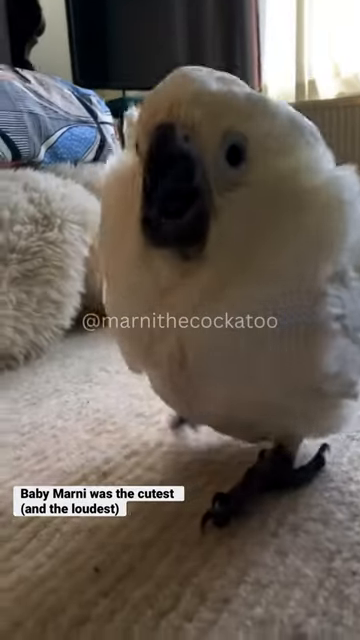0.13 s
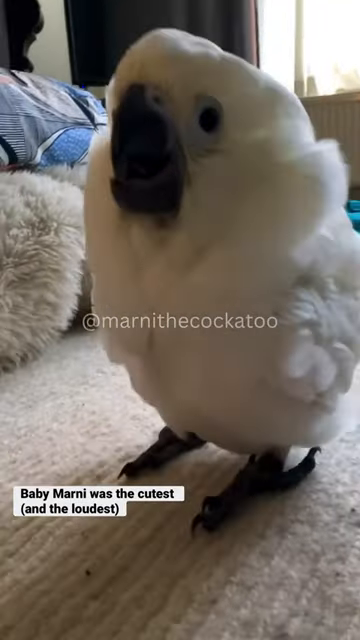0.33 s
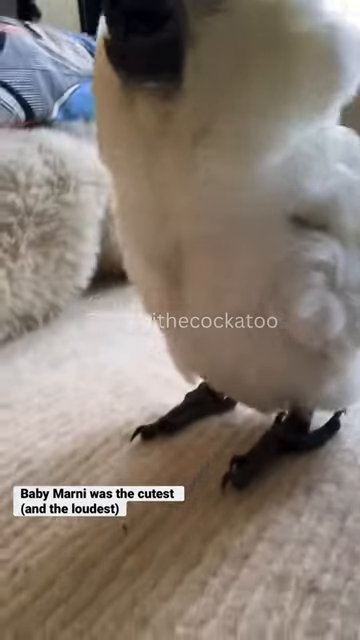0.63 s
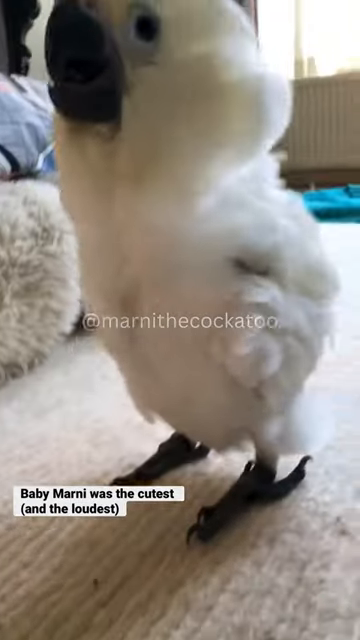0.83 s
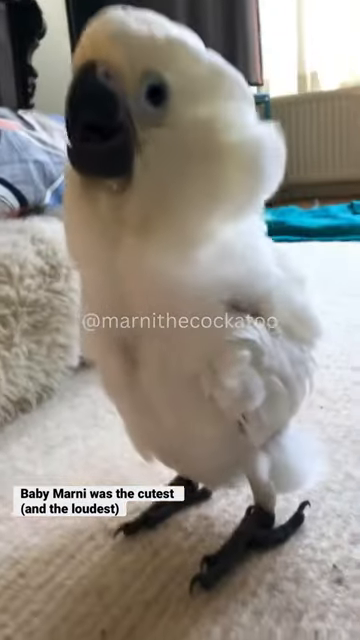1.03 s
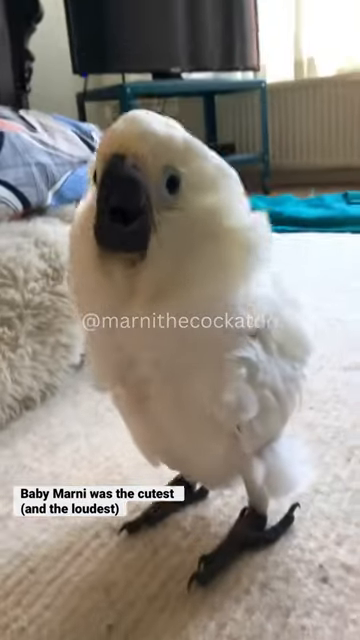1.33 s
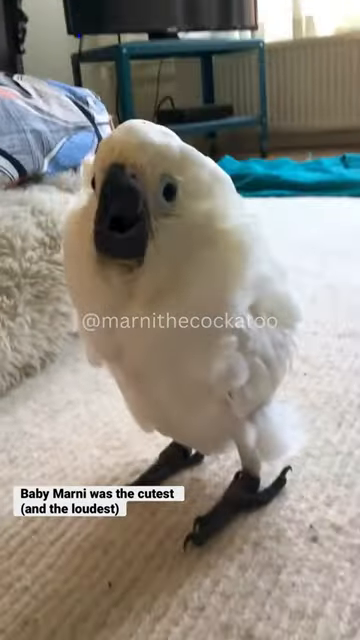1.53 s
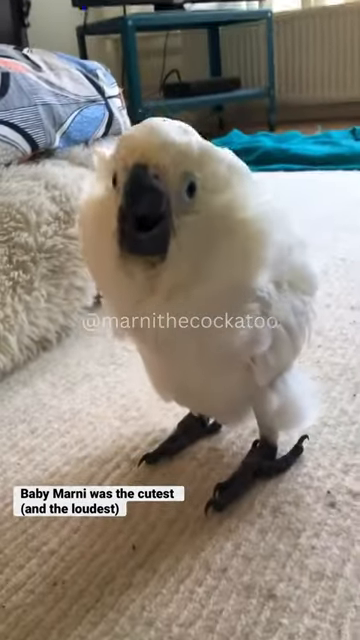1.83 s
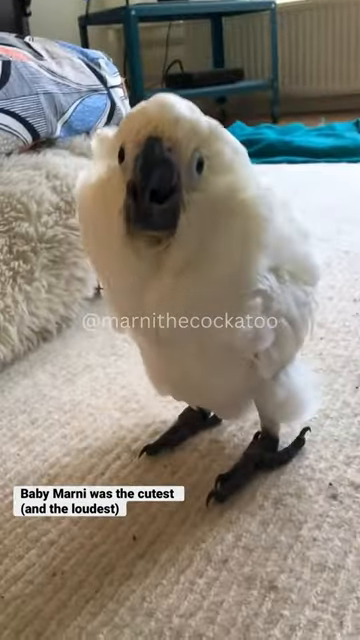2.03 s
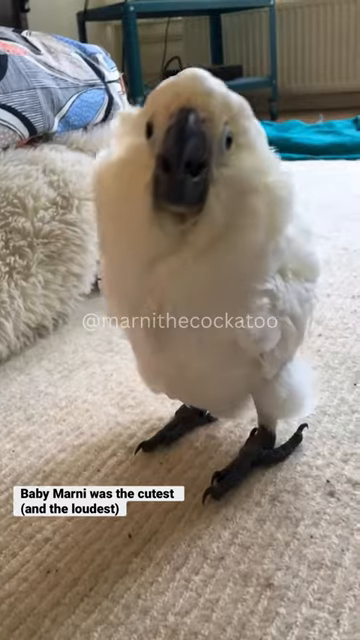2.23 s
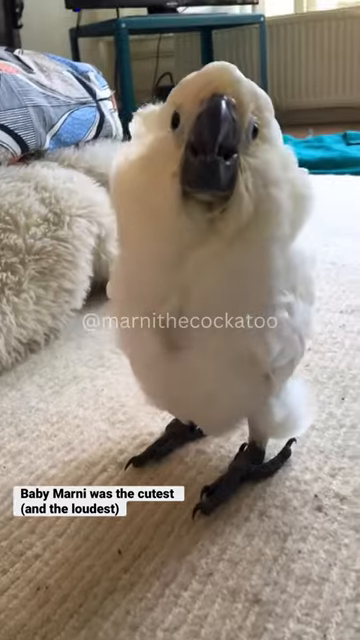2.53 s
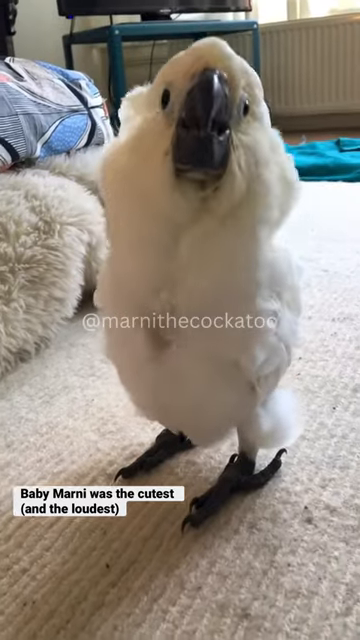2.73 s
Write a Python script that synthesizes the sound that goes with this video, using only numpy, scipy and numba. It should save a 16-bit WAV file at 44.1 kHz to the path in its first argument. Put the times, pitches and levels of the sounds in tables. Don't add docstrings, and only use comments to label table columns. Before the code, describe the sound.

Two loud, grating squawks from a baby cockatoo, after soft handling rumble and feather rustle

```python
import sys
import numpy as np
from scipy import signal
from scipy.fft import rfft, irfft, next_fast_len
from scipy.io import wavfile
from scipy.ndimage import uniform_filter1d, map_coordinates
from numba import njit

SR = 44100
rng = np.random.default_rng(int(sys.argv[2]) if len(sys.argv) > 2 else 0)


def rack_gain(trim_db):
    fader = np.asarray(trim_db, float)
    return 10 ** (fader / 20)


def int16_out(signal):
    q = np.round(np.clip(np.atleast_2d(signal).T, -1, 1) * 32767)
    wavfile.write(sys.argv[1], SR, q.astype(np.int16))


N = 126567


def unit(x):
    return x / np.sqrt(np.mean(x ** 2) + 1e-20)


def along(points, hz):
    f, v = np.transpose(points)
    return np.interp(np.log(hz + 1), np.log(f + 1), v)


def curves(rows):
    s, *cols = np.transpose(rows)
    return [np.interp(np.arange(N) / SR, s, c) for c in cols]


def during(rows):
    return (np.arange(N) > rows[0][0] * SR) & (np.arange(N) < rows[-1][0] * SR)


def wobble(rate):
    knots = rng.standard_normal(int(N * rate / SR) + 4)
    return map_coordinates(knots, [np.arange(N) * rate / SR])


def filtered(x, response):
    m = next_fast_len(N + SR // 2)
    return irfft(rfft(x, m) * response(np.fft.rfftfreq(m, 1 / SR)), m)[..., :N]


def rush(spectrum, patchy_db):
    z = signal.stft(rng.standard_normal(N), nperseg=512)[2]
    field = uniform_filter1d(rng.standard_normal(z.shape), 6, 0)
    field = unit(uniform_filter1d(field, 8, 1))
    x = signal.istft(z * rack_gain(patchy_db * field), nperseg=512)[1][:N]
    lowest, highest = spectrum[0][0], spectrum[-1][0]
    return unit(filtered(x, lambda hz: rack_gain(along(spectrum, hz)) * (hz >= lowest) * (hz <= highest)))


@njit
def resonate(x, hz, width_hz, rate):
    y, r = np.zeros(len(x)), np.exp(-np.pi * width_hz / rate)
    for i in range(2, len(x)):
        push = (1 - r * r) / 2 * (x[i] - x[i - 2])
        y[i] = push + 2 * r * np.cos(2 * np.pi * hz[i] / rate) * y[i - 1] - r * r * y[i - 2]
    return y


def ring(s, db, hz, t60, rise):
    t = np.clip(np.arange(N) / SR - s, 0, None)
    return rack_gain(db - 60 * t / t60) * np.sin(2 * np.pi * hz * t) * (1 - np.exp(-t / rise))


def hissing(rings, level):
    flow = sum(rack_gain(g) * resonate(rng.standard_normal(N), np.full(N, hz * 1.), float(w), SR)
               for hz, w, g in rings)
    return unit(flow) * rack_gain(curves(level)[0]) * during(level)


def syrinx(rate, rough, swing):
    # f/Hz, level/dB
    snap_tone = [(250, 9.5), (500, 10), (800, 8.5), (1200, 2), (2600, 1), (3200, 6), (4400, -10),
                 (16000, -15.5)]
    turns = np.cumsum(rate * np.exp(.55 * rough * wobble(700))) / SR
    at = np.interp(np.arange(1, int(turns[-1])), turns, np.arange(N))
    i = at.astype(int)
    scatter_db = 7 * rough[i] * rng.standard_normal(len(i))
    beat_depth = .22 + .6 * np.clip(2 - 2 * rough[i] / .17, 0, 1)
    size = rack_gain(scatter_db) * (1 + beat_depth * swing[i])
    tap = i[:, None] + np.arange(-7, 9)
    late = tap - at[:, None]
    shape = np.sinc(late) * np.cos(np.pi * late / 16) ** 2
    snaps = np.bincount(np.clip(tap, 0, N - 1).ravel(), (size[:, None] * shape).ravel(), N)
    breath = .5 * rough * rng.standard_normal(N)
    return filtered(unit(snaps) + breath, lambda hz: rack_gain(along(snap_tone, hz)))


def throat_and_beak(source, db, rate, pipe, beak):
    # multiple of snap rate, width/Hz, level/dB
    chest = [(1, 230, -24)]
    # multiple of windpipe note, width/Hz, level/dB
    windpipe = [(1, 134, 7.5)]
    # multiple of beak note, width/Hz, level/dB
    beak_rings = [(1.005, 280, 3), (.955, 260, -4)]
    # multiple of beak note, width/Hz, level/dB
    edge = [(.655, 550, -0.5), (2.4, 1100, -17), (2.66, 800, -13)]
    # f/Hz, width/Hz, level/dB
    skull = [(13800, 1800, -38)]
    # width/Hz, level/dB
    mouth = [(230, -8.5), (283, -14.5)]
    # t/s, palate f/Hz, tongue f/Hz, upper ring f/Hz, level above 10 kHz/dB
    gape = [(1.33, 2900, 3270, 6740, -9), (1.37, 3040, 3670, 6670, -11), (1.45, 3000, 3630, 6920, -12),
            (1.6, 3060, 3480, 7760, -1), (1.95, 3260, 3700, 8030, 2), (2.35, 3000, 3430, 7820, -3),
            (2.6, 3151, 3600, 7660, -3.5), (2.85, 3086, 3120, 6860, -3)]
    palate, tongue, upper, air_db = curves(gape)
    bright_db = .35 * (db + 35)
    top = SR / 2.2

    tract = [(k * rate, w, g) for k, w, g in chest]
    tract += [(k * pipe, w, g) for k, w, g in windpipe]
    tract += [(np.full(N, 1. * hz), w, g + air_db) for hz, w, g in skull]
    tract += [(hz, w, g) for hz, (w, g) in zip((palate, tongue), mouth)]
    voice = np.zeros(N)
    for hz, w, g in tract:
        voice += rack_gain(g + bright_db * (hz > 2500)) * resonate(source, np.minimum(hz, top), float(w), SR)

    wide_db = .016 * np.clip(beak - 5720, 0, None)
    for k, w, g in beak_rings:
        voice -= rack_gain(g + bright_db / 2 + wide_db) * resonate(source, k * beak, float(w), SR)

    steep = [(k * beak, w, g + air_db * (k > 2)) for k, w, g in edge]
    steep.append((upper, 430, -3.5))
    for hz, w, g in steep:
        hz = np.minimum(hz, top)
        flicker_db = 1.5 * wobble(45) * (hz > beak)
        twice = resonate(resonate(source, hz, float(w), SR), hz, float(w), SR)
        voice += rack_gain(g + bright_db / 2 + flicker_db) * twice
    direct = filtered(source, lambda hz: 1 / (1 + (hz / 4000) ** 12))
    return voice + rack_gain(-9) * direct


def clear_tone(hz, rough, level_db, share):
    tone = np.cos(2 * np.pi * np.cumsum(hz * (1 + .06 * rough * wobble(150))) / SR)
    clean = np.clip(1 - 2.5 * rough, 0, 1)
    return rack_gain(level_db + 1.5 * wobble(40)) * clean * np.minimum(share, 2) * tone


def rasp(call):
    # t/s, level/dB
    beat_level = [(1.33, -47), (1.38, -57), (1.42, -72), (1.85, -61), (1.96, -68), (2.0, -87), (2.35, -50),
                  (2.39, -64), (2.46, -66), (2.49, -55), (2.53, -66), (2.66, -68), (2.71, -55),
                  (2.81, -56.5), (2.84, -77)]
    db, rate, beat, pipe, beak, rough = curves(call)
    rough = np.clip(rough, 0, 1)
    swing = np.cos(2 * np.pi * np.cumsum(beat * (1 + rough ** 2 * 1.8 * wobble(150))) / SR)
    on = during(call)

    voice = throat_and_beak(syrinx(rate, rough, swing), db, rate, pipe, beak)
    voice = voice / np.sqrt(np.mean(voice[on] ** 2))
    voice += clear_tone(pipe, rough, 2, np.minimum(rough / .2, 1))
    voice += clear_tone(rate, rough, -3, np.maximum(1, 3.4 - rough / .07))
    power = np.abs(uniform_filter1d(voice ** 2, size=int(.012 * SR)) + 1e-9)
    voice = voice / power ** (.6 / 2)
    bulge = filtered(voice ** 2 * on, lambda hz: 1 / (1 + (600 / (hz + 1)) ** 4) / (1 + (hz / 4500) ** 6))
    voice = voice + .09 * bulge

    low_beat = rack_gain(curves(beat_level)[0] + 2.5 * rough * wobble(40)) * swing
    return (voice * rack_gain(db + .5 * wobble(40.4)) + low_beat) * on


def beak_ticks():
    # t/s, peak level/dB, f/Hz, t60/s
    ticks = [(.3242, -58, 1700, .006), (.5072, -60, 1420, .006), (.7195, -38, 2200, .002),
             (1.1947, -43, 1900, .018), (2.004, -54, 800, .06), (2.8345, -52, 13200, .003),
             (2.8435, -60, 13500, .003), (2.8685, -30, 6000, .0006)]
    return sum(ring(s, db - 2, hz, t60, .0002) for s, db, hz, t60 in ticks)


def breaths():
    # t/s, level/dB
    inhale = [(.76, -94), (.84, -68.5), (.95, -72), (1.05, -75)]
    # f/Hz, width/Hz, level/dB
    nostril = [(5630, 2800, 4), (8600, 150, 11), (13100, 450, 1)]
    # t/s, level/dB
    burst = [(1.308, -63.5), (1.326, -59.5), (1.345, -51.5), (1.385, -56), (1.41, -70)]
    # f/Hz, width/Hz, level/dB
    leak = [(1800, 1700, 6), (8050, 290, 7.5), (12000, 220, -9)]
    return hissing(nostril, inhale) + hissing(leak, burst)


def feathers():
    # t/s, level/dB
    rustle = [(0, -59), (.1, -60), (.25, -59), (.4, -66.5), (.62, -64.5), (.72, -93)]
    # f/Hz, level per Hz/dB
    feather_tone = [(210, -3), (350, 1.5), (429, -6.5), (548, -11.5), (1600, -11.5), (2720, -18),
                    (9000, -29.5), (11700, -39.5), (19800, -120)]
    level = rack_gain(curves(rustle)[0] + 1.5 * wobble(90))
    return rush(feather_tone, patchy_db=1.2) * level * during(rustle)


def bird():
    # t/s, level/dB, snap rate f/Hz, beat f/Hz, windpipe f/Hz, beak f/Hz, roughness 0-1
    first_call = [
        (1.3275, -48, 1030, 485, 1500, 5100, .06),
        (1.333, -39, 980, 490, 1470, 5150, .07),
        (1.362, -30, 985, 492, 1540, 5150, .17),
        (1.424, -33, 1110, 520, 1640, 5200, .2),
        (1.542, -33, 1210, 550, 1740, 5550, .2),
        (1.808, -37, 1310, 560, 1810, 5920, .22),
        (1.932, -37, 1300, 560, 1780, 5860, .22),
        (1.975, -45, 1270, 540, 1750, 5850, .35),
        (2.018, -56, 900, 480, 1660, 5750, .4),
    ]
    second_call = [
        (2.3525, -46, 1100, 360, 1650, 5650, .3),
        (2.355, -40, 1120, 360, 1660, 5660, .3),
        (2.39, -36, 1160, 450, 1680, 5700, .32),
        (2.49, -38, 1220, 485, 1720, 5740, .2),
        (2.55, -38, 1220, 475, 1640, 5720, .32),
        (2.70, -40, 1180, 500, 1590, 5450, .25),
        (2.75, -41, 1250, 435, 1570, 5300, .14),
        (2.80, -42, 1200, 395, 1540, 5150, .14),
        (2.848, -62, 1100, 370, 1500, 5100, .4),
    ]
    return rasp(first_call) + rasp(second_call) + beak_ticks() + breaths() + feathers()


def room(x):
    # f/Hz, t60/s
    echo = [(300, .22), (2000, .22), (6000, .2), (10000, .1)]
    hz, t, z = signal.stft(rng.standard_normal(SR // 2), SR, nperseg=256)
    fade = rack_gain(-60 * t / along(echo, hz)[:, None])
    tail = signal.istft(z * fade, SR, nperseg=256)[1]
    return signal.fftconvolve(np.pad(x, (200, 0)), tail / np.linalg.norm(tail))[:N]


def hand():
    # t/s, peak level/dB, f/Hz
    bumps = [(0.241, -18.5, 114), (0.397, -21.5, 74.6), (0.966, -14.5, 99.7), (1.329, -24.5, 103),
             (1.408, -22.5, 81), (2.836, -20.5, 95)]
    # t/s, level/dB
    grip = [(0.0, -40.5), (0.58, -43), (0.65, -37), (0.75, -44), (0.89, -40), (0.95, -50.5), (0.97, -33.5),
            (1.13, -45.5), (1.41, -39.5), (1.53, -45), (2.74, -40), (2.78, -50), (2.84, -40), (2.87, -40)]
    # f/Hz, level per Hz/dB
    rumble_tone = [(13, -12), (22, -4), (70, -4.5), (102, 4.5), (115, -5), (130, -8.5), (193, -14),
                   (369, -26), (520, -86), (680, -42), (1140, -120)]
    knocks = sum(ring(s, db - 4, hz, t60=.07, rise=.005) for s, db, hz in bumps)
    rumble = unit(rush(rumble_tone, patchy_db=1.5) * rack_gain(1.5 * wobble(14)))
    return rumble * rack_gain(curves(grip)[0] - 1.5) + knocks


def air():
    # f/Hz, level/dB
    hiss_tone = [(240, -66), (400, -9), (706, -12.5), (917, -14.5), (2170, -17), (2310, -22.5),
                 (2730, -19.5), (8920, -25.5), (15800, -34)]
    # t/s, level/dB, f/Hz
    hum_course = [(1.8, -81, 96.3), (1.9, -57.5, 94.2), (2.2, -57.5, 100), (2.3, -63.5, 95),
                  (2.55, -53, 94.5), (2.87, -59, 95.4)]
    # multiple, level/dB
    overtones = [(1, 0), (2, 3), (3, -7)]
    db, hz = curves(hum_course)
    turn = 2 * np.pi * np.cumsum(hz * (1 + 0.0174 * wobble(18))) / SR
    hum = sum(rack_gain(g + 3.7 * wobble(12)) * np.sin(k * turn) for k, g in overtones)
    return rack_gain(-69.5) * rush(hiss_tone, patchy_db=1.8) + hum * rack_gain(db) * during(hum_course)


def scene():
    cockatoo = bird()
    return (cockatoo + rack_gain(-18) * room(cockatoo) + hand() + air())[None]


def band_limit(x):
    return signal.sosfilt(signal.butter(12, 15900, fs=SR, output="sos"), x)


def record(dry):
    # from t/s, to t/s, from f/Hz, to f/Hz
    lost = [(1.445, 1.5, 8400, 11000), (2.385, 2.535, 8400, 11000), (1.36, 1.41, 8700, 9300),
            (1.6, 1.81, 8350, 8900), (1.85, 1.96, 8500, 8800), (2.6, 2.72, 7900, 8500),
            (2.78, 2.82, 7800, 8400), (2.42, 2.47, 14300, 15100), (2.335, 2.345, 7500, 15800),
            (2.336, 2.344, 1800, 5500), (1.35, 1.42, 9700, 10500), (1.49, 1.54, 8300, 9000),
            (2.37, 2.39, 10200, 11000), (1.67, 1.77, 13200, 13500), (2.819, 2.831, 9300, 15800)]
    low_cut = signal.butter(3, 42, "high", fs=SR, output="sos")
    mix = signal.sosfilt(low_cut, dry)
    t = np.arange(N) / SR
    for a, b, lo_hz, hi_hz in lost:
        off = uniform_filter1d(1. * (t > a) * (t < b), size=400)
        mix = mix - off * filtered(mix, lambda hz: (hz > lo_hz) & (hz < hi_hz))
    mix = filtered(mix, lambda hz: hz < 15800)
    return band_limit(mix)


dry = scene()
out = record(dry)
int16_out(out)
```